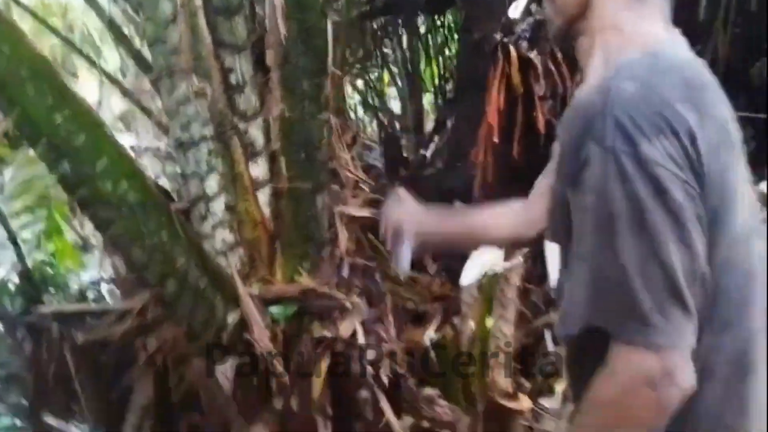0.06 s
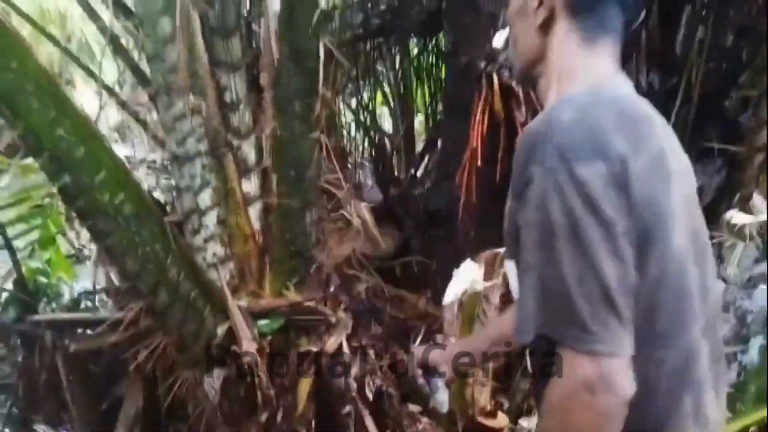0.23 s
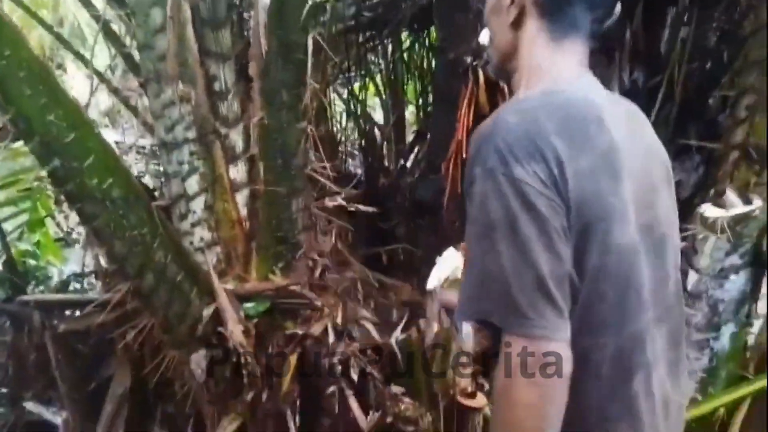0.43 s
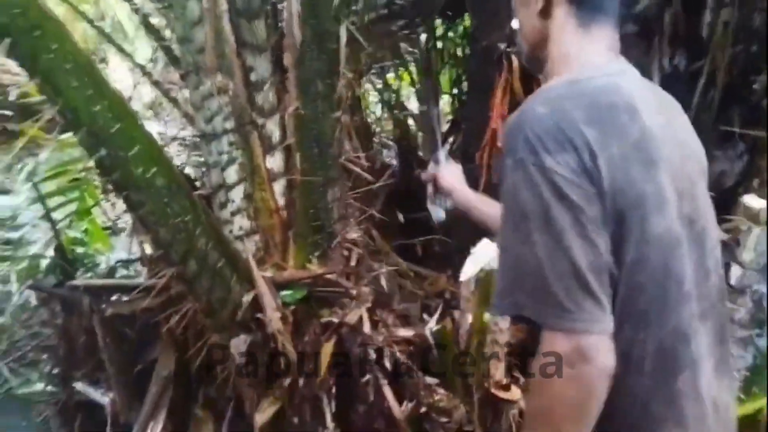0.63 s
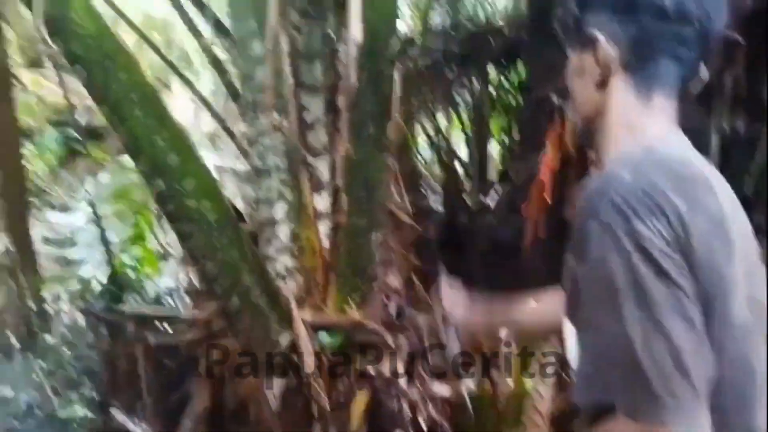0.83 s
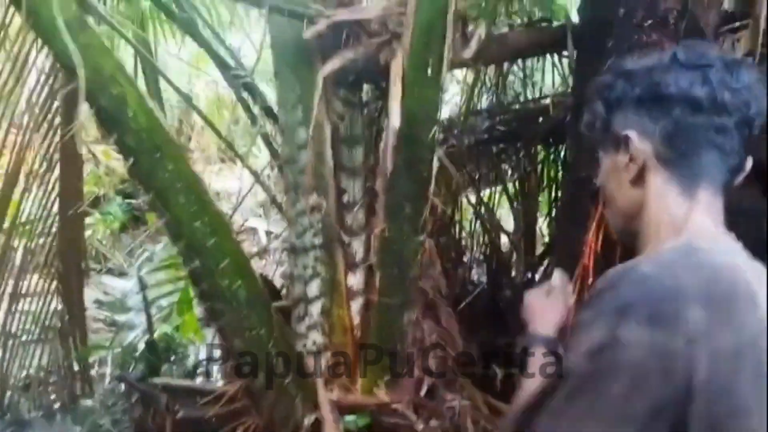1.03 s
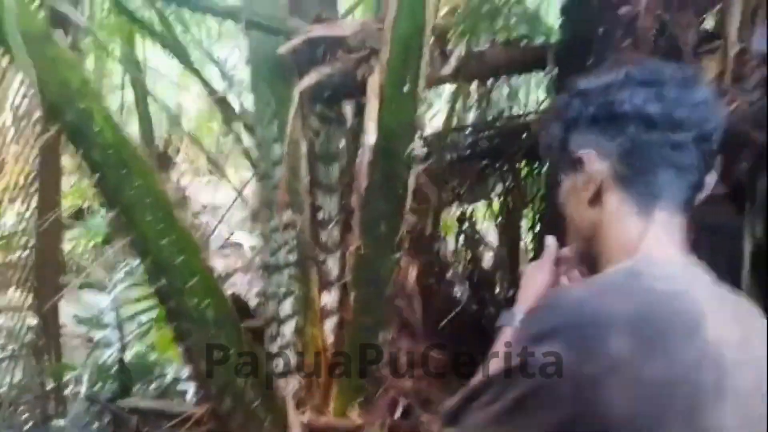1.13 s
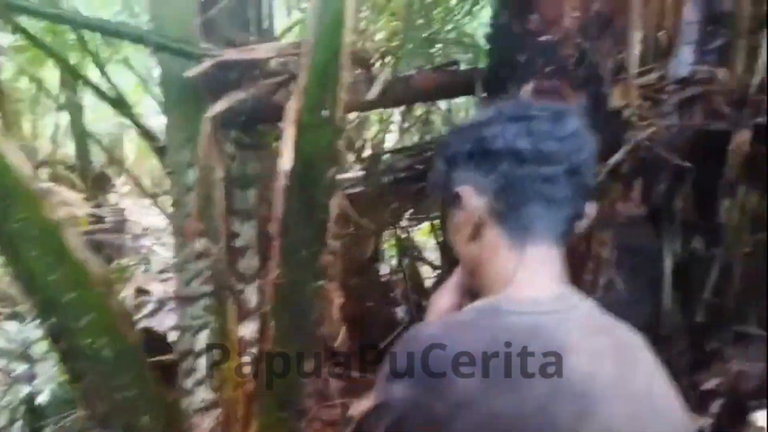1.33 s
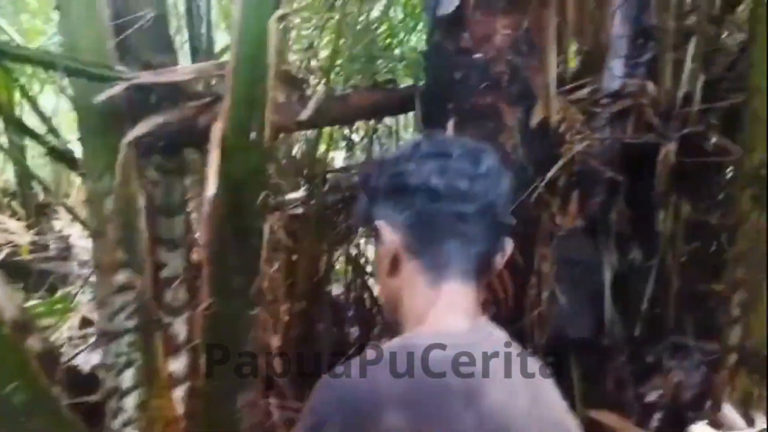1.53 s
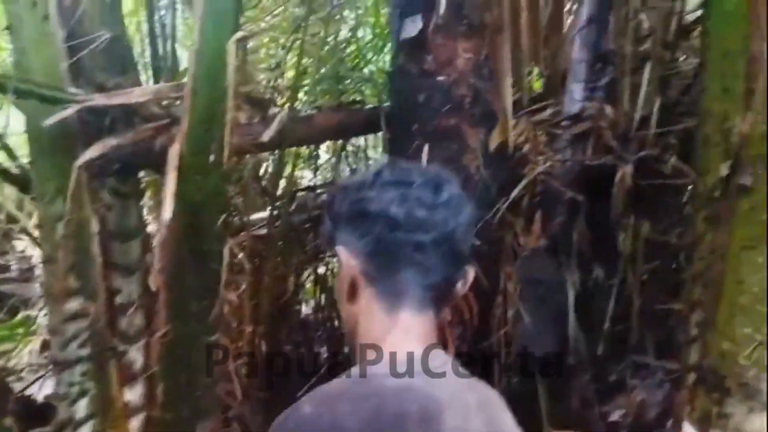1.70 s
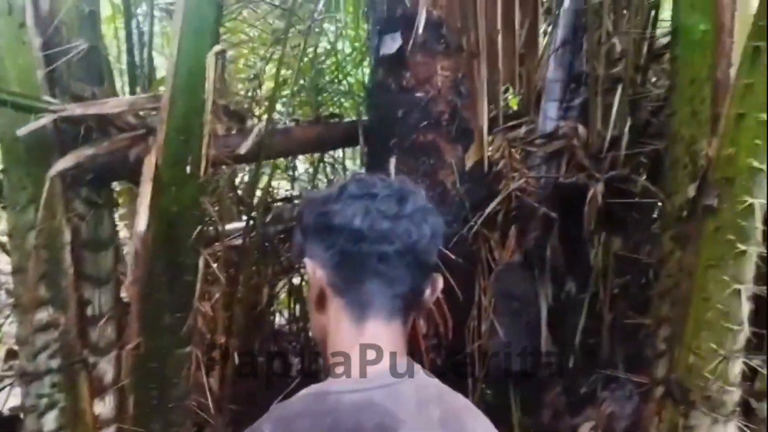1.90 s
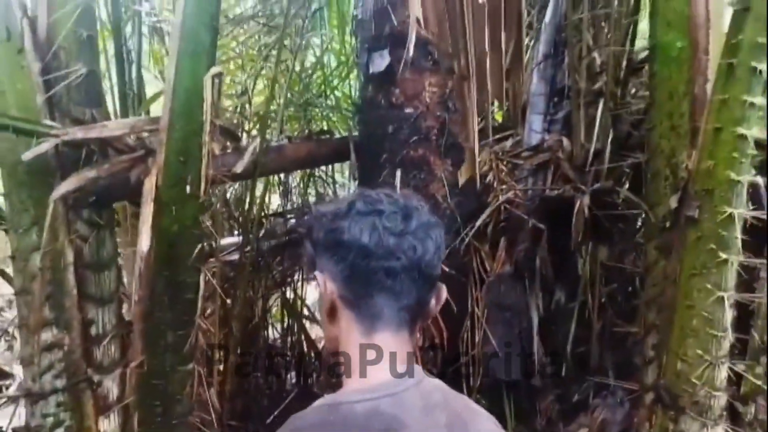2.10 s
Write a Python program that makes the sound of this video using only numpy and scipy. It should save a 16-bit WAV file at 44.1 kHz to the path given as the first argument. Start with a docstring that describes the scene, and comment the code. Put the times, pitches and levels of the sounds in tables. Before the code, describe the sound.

A machete chops a spiny palm base in a forest, heard close in stereo. Dry fronds rustle at first; at 0.2 s a sharp cut cracks, with hollow knocks and bright snaps until 0.4 s. Rustling and small rib cracks follow. From 1.0 to 1.3 s a longer crunching cut tears fibres, then near quiet, a hard woody chop at 1.8 s, and a faint rustle near 2.1 s. Soft short echo, faint hiss.

```python
"""In a forest, a couple of metres from a stereo microphone, a machete cuts the spiny base of a palm.
Over a faint hiss, dry fronds rustle from the start as bursts of tiny fractures; ribs crack, stalks knock.
At about 0.2, 1.0 and 1.8 s come three cuts: dense runs of random fractures that also ring the blade's modes.
Bright noise bursts give short snaps and a few softer swishes; blows ring the hollow stalks' damped modes.
The trunks return a short, soft echo of it all, made by convolution with decaying noise."""
import sys
import numpy as np
from scipy import signal
from scipy.fft import rfft, irfft, next_fast_len
from scipy.io import wavfile

SR = 44100
rng = np.random.default_rng(int(sys.argv[2]) if len(sys.argv) > 2 else 0)


def unload_wav(signal):
    """Save mono or channel-first audio to the path in sys.argv[1] as 16-bit WAV at rate SR, clipped to [-1, 1]."""
    wavfile.write(
        sys.argv[1],
        SR,
        np.round(np.clip(np.atleast_2d(signal).T, -1, 1) * 32767).astype(np.int16),
    )


N = 94815


def undb(db):
    """Decibels to gain."""
    return 10 ** (np.asarray(db) / 20)


def unit(x):
    """Scale to rms 1."""
    return x / np.sqrt(np.mean(x ** 2) + 1e-20)


def since(start):
    """Seconds since a moment, zero before it."""
    return np.maximum(np.arange(N) / SR - start, 0)


def colour(x, points):
    """Causal minimum-phase filter through (Hz, dB) points, interpolated over log frequency."""
    size = next_fast_len(N + 4096)
    hz, db = np.array(points).T
    f = np.maximum(np.abs(np.fft.fftfreq(size, 1 / SR)), 1)
    gain = undb(np.interp(np.log(f), np.log(hz), db))
    # Folding the cepstrum onto positive time makes the filter causal.
    cepstrum = np.fft.ifft(np.log(gain)).real
    cepstrum[1:size // 2] *= 2
    cepstrum[size // 2 + 1:] = 0
    return irfft(rfft(x, size) * np.exp(rfft(cepstrum, size)), size)[..., :N]


def butter(x, kind, hz, order=2):
    """Butterworth low-pass or high-pass."""
    return signal.sosfilt(signal.butter(order, hz, kind, fs=SR, output="sos"), x)


def band(x, hz, q):
    """Resonant band-pass."""
    return signal.lfilter(*signal.iirpeak(min(hz, SR / 3), max(q, .6), fs=SR), x)


def ring(x, hz, t60):
    """One decaying mode driven by x."""
    pole = np.exp((2j * np.pi * hz - np.log(1000) / t60) / SR)
    return signal.lfilter([1], [1, -pole], x + 1e-18).imag


# Stereo width at the microphone. Each row: frequency in Hz, side minus mid in dB.
SIDE_BY_FREQUENCY = [(50, 0), (170, -16.5), (400, -11.5), (800, -5.5), (1500, -2.5), (3000, -0.5),
                     (6000, 0.5), (9000, -10.5), (11000, -14.5), (15000, -11.5)]


def stereo(pair):
    """Mid and side to left and right; the low mids and the top stay nearer the centre."""
    mid, side = pair[0], colour(pair[1], SIDE_BY_FREQUENCY)
    return unit(np.array([mid + side, mid - side]))


RIGHT_DB = 1  # how much louder the fronds, cuts and echo are panned on the right


def pan(db):
    """Left and right gains for a source that is db louder on the right."""
    return undb(np.array([[-db], [db]]) / 2)


def crackle(rate, spread_db):
    """Tiny fractures at random times with scattered sizes, as mid and side."""
    struck = rng.random(N) < rate / SR
    size = struck * undb(spread_db * np.clip(rng.standard_normal(N), -2, 2))
    return unit(size * np.sign(rng.standard_normal((2, N))))


BURST_RISE_S = .0004


def burst(start, decay_s):
    """A sharp rise and an exponential fall."""
    age = since(start)
    return (1 - np.exp(-age / BURST_RISE_S)) * np.exp(-np.minimum(age / decay_s, 40))


def wander(seconds):
    """A random level that changes within the given time; rms 1."""
    return unit(signal.lfilter([1], [1, -np.exp(-1 / (seconds * SR))], rng.standard_normal(N)))


def splinters(lo_hz, hi_hz, rate, t60, spread_db, count):
    """Many slivers, each with its own pitch, tick at their own random moments."""
    pitches = lo_hz + (hi_hz - lo_hz) * (np.arange(count) + rng.random(count)) / count
    return unit(sum(ring(crackle(rate, spread_db), hz, t60) for hz in pitches))


STALK_ECHO_S, STALK_ECHO_DB, STALK_MIRROR_HZ = .004, -2.5, 1500  # longest lag, level, lowest treble


def nearby(x, count=7):
    """The thin stalks right around a source mirror its treble within milliseconds and ripple its colour."""
    lags = (STALK_ECHO_S * SR * rng.uniform(.1, 1, count)).astype(int)
    signs = np.sign(rng.standard_normal(count))
    treble = butter(x, "high", STALK_MIRROR_HZ)
    mirrored = sum(sign * np.roll(treble, lag, axis=-1) for sign, lag in zip(signs, lags))
    return unit(x + undb(STALK_ECHO_DB) / np.sqrt(count) * mirrored)


FOREST_DB = -56
# Colour of the forest hiss. Each row: frequency in Hz, gain in dB.
FOREST_COLOUR = [(25, -17), (60, 0), (110, 7.5), (280, 5), (600, 0.5), (1500, -14), (3200, 0), (5500, -1),
                 (9600, 2.5), (15500, -32)]


def forest():
    """The faint hiss of the forest is steady noise with a fixed colour."""
    return undb(FOREST_DB) * stereo(colour(rng.standard_normal((2, N)), FOREST_COLOUR))


RUSTLES_PER_S, RUSTLE_SPREAD_DB = 3600, -0.5
SCRAPE_DB, SCRAPE_Q, SCRAPE_SPREAD_DB, SCRAPE_S = -6, 4, 7, .012


def scrapes(lo_hz, hi_hz, count):
    """Leaves of different sizes rub, each in its own band and its own short spurts."""
    grain = stereo(crackle(RUSTLES_PER_S, RUSTLE_SPREAD_DB))
    out = 0
    for hz in np.geomspace(lo_hz, hi_hz, count):
        leaf = unit(band(band(grain, hz, SCRAPE_Q), hz, SCRAPE_Q))
        out = out + leaf * undb(SCRAPE_SPREAD_DB * np.clip(wander(SCRAPE_S), -2, 2))
    return unit(out)


CATCH_DB, CATCH_S = 2.2, .004  # unevenness of the brushing, and how fast it changes
TICK_DB, TICKS_PER_S, TICK_SPREAD_DB, TICK_T60_S = -5, 14, 5, .025  # the rate is for each rib
# Colour of dry fronds and tough strands. Each row: frequency in Hz, gain in dB.
FROND_COLOUR = [(60, 2), (250, 7.5), (800, 4), (1500, 3), (2200, 2.5), (3300, 5), (4500, -1), (5600, -9.5),
                (6700, 6), (7800, -11.5), (9500, 1), (15500, -1.5)]
# Loudness of the rustle over time. Each row: time in seconds, level in dB.
RUSTLE_LEVEL = [(0, -42), (.1, -47.5), (.17, -49.5), (.33, -40.5), (.46, -40.5), (.55, -43.5), (.63, -39),
                (.73, -45.5), (0.808, -54), (.87, -47), (.92, -44.5), (.96, -48), (1.2, -43.5), (1.29, -56),
                (1.336, -48.5), (1.411, -54), (1.52, -53.5), (1.61, -58.5), (1.65, -42), (1.69, -60),
                (1.74, -56.5), (2.07, -55), (2.15, -50.5)]


def fronds():
    """Dry leaves brush and scrape in uneven little spurts while their ribs tick."""
    at, db = np.array(RUSTLE_LEVEL).T
    brush = nearby(stereo(colour(crackle(RUSTLES_PER_S, RUSTLE_SPREAD_DB), FROND_COLOUR)))
    brush = brush * undb(CATCH_DB * wander(CATCH_S))
    ribs = splinters(734, 4466, TICKS_PER_S, TICK_T60_S, TICK_SPREAD_DB, count=16)
    ticks = stereo(colour(ribs, FROND_COLOUR))
    leaves = brush + undb(TICK_DB) * ticks + undb(SCRAPE_DB) * scrapes(914, 3650, count=9)
    return unit(leaves) * undb(np.interp(since(0), at, db)) * pan(RIGHT_DB)


CRACK_Q, RIB_RING_DB, RIB_RING_Q, CLICK_DB = 2.5, -2, 14, 0.5
# Dry twigs and frond ribs cracking. Each row: start in seconds, level in dB, pitch in Hz,
# decay time constant in seconds, right minus left in dB.
RIB_CRACKS = [(.002, -38, 2310, 0.035, -1), (0.241, -26.5, 3430, 0.024, 3),
              (0.2424, -15.5, 8940, 0.0068, -2), (0.288, -20, 4950, 0.0078, -2),
              (0.3996, -32, 1500, 0.0019, 13), (0.4636, -34, 3260, 0.0052, 4),
              (0.4704, -32, 2870, 0.0047, 1), (0.528, -41.5, 3460, 0.0046, -1),
              (0.54, -45.5, 1420, 0.033, -5), (.593, -45, 3540, .007, 10), (0.6145, -38, 3220, 0.0072, 9),
              (0.6533, -37.5, 2860, .008, 9), (0.6752, -32, 1900, 0.0057, 7),
              (0.6966, -29.5, 1610, 0.0059, 7), (0.73, -37, 2050, 0.0049, 8),
              (0.8455, -45.5, 2780, 0.0012, 35), (0.8823, -32.5, 3320, 0.015, 5.5),
              (0.926, -41.5, 3500, 0.014, 10), (1.009, -27, 3020, 0.0062, -1),
              (1.093, -30.5, 2870, .005, -8), (1.159, -25, 2400, 0.0085, 5),
              (1.2709, -37, 2470, 0.0032, -1), (1.6515, -37.5, 2530, 0.0042, 3),
              (1.752, -38, 2980, 0.0023, 5), (1.7734, -30, 2920, 0.0013, -22),
              (1.779, -19.5, 1700, 0.0035, -8), (2.122, -45.5, 3800, 0.067, 1)]


def cracks():
    """Dry ribs break with a sharp click and a short crumble, through a broad resonance and a narrow ring."""
    grain = stereo(rng.standard_normal((2, N)))
    out = 0
    for start, db, hz, decay, right in RIB_CRACKS:
        broad = unit(band(band(grain, hz, CRACK_Q), hz, CRACK_Q / 2))
        narrow = unit(band(grain, hz, RIB_RING_Q))
        crumble = burst(start, decay) * unit(broad + undb(RIB_RING_DB) * narrow)
        click = band(band(signal.unit_impulse(N, int(start * SR)), hz, 0.8), hz, 2.2)
        click = click / np.abs(click).max()
        out = out + undb(db) * pan(right) * (crumble + undb(CLICK_DB) * click)
    return out


STALK_LOWEST_HZ, CONTACT_S = 102, .0009  # high-pass corner, rise time constant of a knock
BLOW_RATTLE_DB, RATTLE_SHARE = -10.5, 0.73  # the rattle's decay is this share of the smothering time
# Modes of the hollow stalks. Each row: frequency in Hz, level in dB, t60 before smothering in seconds.
STALK_MODES = [(120, 13, 0.2), (211.4, 10.5, 0.37), (255.7, 12, 0.13), (330, -6, 0.12), (400, -4, 0.022),
               (491.3, 8, 0.073), (614, 0.5, 0.07), (652.6, 9, 0.056), (719.7, 4, 0.095), (847, 13, 0.02),
               (1032, 7, .07), (1108, 9, 0.029), (1366, 18.5, 0.014), (1723, 12, 0.17)]
# Blows on the stalks. Each row: start in seconds, level in dB, centre of the ring in Hz,
# its spread in octaves, time constant in seconds in which the husk smothers it.
STALK_BLOWS = [(.002, -43, 292, 1.6, 0.021), (.216, -24.5, 524, 0.19, 0.024), (.221, -24, 1080, 0.18, .04),
               (.236, -24, 258, 0.12, 0.094), (.243, -27.5, 770, 0.59, 0.033),
               (.294, -31.5, 520, 0.37, 0.057), (.297, -39, 242, 0.41, .06),
               (0.402, -30.5, 306.4, 0.12, 0.038), (.404, -39.5, 850, 0.58, 0.013),
               (.566, -42, 1110, 0.13, 0.023), (.6135, -41.5, 830, 0.15, 0.039),
               (.6525, -32.5, 666, 0.56, 0.027), (.6745, -31, 820, 0.63, 0.023),
               (.6965, -31, 604, 0.13, 0.022), (.731, -44, 790, 0.97, 0.052),
               (0.7805, -49, 920, 0.18, 0.015), (1.011, -24.5, 746, 0.16, 0.064),
               (1.012, -28.5, 1090, 0.32, 0.008), (1.017, -29.5, 219, 0.22, 0.05),
               (1.053, -25.5, 373, 0.4, 0.031), (1.093, -26.5, 700, 0.13, 0.006),
               (1.098, -28, 480, 0.091, 0.033), (1.100, -30, 272, 0.15, 0.088),
               (1.164, -35.5, 820, 0.58, 0.019), (1.1693, -19, 228, 0.49, 0.018),
               (1.17, -29, 133, .2, 0.019), (1.779, -26.5, 363, 0.24, 0.0087),
               (1.793, -16.5, 302, 0.18, 0.021), (1.794, -26, 562, 0.083, 0.025),
               (1.805, -39, 360, 0.14, 0.029), (1.820, -45, 680, 0.14, 0.0081),
               (1.841, -36, 710, 0.074, 0.0067), (1.850, -28.5, 173, 0.61, 0.025),
               (2.128, -52.5, 800, 0.17, 0.044)]


def stalks():
    """Each blow rings the stalk modes near its own centre and rattles the loose husk."""
    out, husk = 0, stereo(rng.standard_normal((2, N)))
    hz, mode_db, t60 = np.array(STALK_MODES).T[:, :, None]
    age = np.arange(SR // 5) / SR
    modes = undb(mode_db) * np.sin(2 * np.pi * hz * age) * np.exp(-np.log(1000) * age / t60)
    for start, db, centre, spread, smother in STALK_BLOWS:
        weight = np.exp(-.5 * (np.log2(hz / centre) / spread) ** 2)
        knock = (weight * modes).sum(axis=0)
        knock = knock * (1 - np.exp(-age / CONTACT_S)) * np.exp(-age / smother)
        knock = knock / np.sqrt(np.sum(knock ** 2) / (SR / 100))  # the energy of rms 1 over 10 ms
        rattle = burst(start, RATTLE_SHARE * smother) * unit(band(band(husk, centre, 1.0), centre, 1.0))
        knock = np.pad(knock, (int(start * SR), N))[:N]
        out = out + undb(db) * (knock + undb(BLOW_RATTLE_DB) * rattle)
    return butter(out, "high", STALK_LOWEST_HZ)


# Colour of crisp fibres and bright bursts. Each row: frequency in Hz, gain in dB.
FIBRE_COLOUR = [(500, -4.5), (2500, -6.5), (5200, -5), (6500, 5), (7200, -0.5), (9200, 9), (11000, -0.5),
                (12300, 9), (15000, 5.5), (16000, 12)]
# Bright noise bursts: short snaps of spines and fibres, and a few longer, softer swishes.
# Each row: start in seconds, level in dB, decay time constant in seconds, right minus left in dB.
BRIGHT_BURSTS = [(0.1874, -30, 0.013, 4.5), (0.2087, -8, 0.0012, 16), (0.2413, -26, 0.0027, -12),
                 (0.2443, -13, 0.0034, 6), (0.289, -12.5, 0.0059, 0), (0.3747, -23, 0.0064, -14),
                 (0.3802, -25, 0.0049, 30), (0.3961, -2.5, 0.001, -4), (0.4011, -8.5, 0.0035, 3.5),
                 (0.407, -32, 0.041, -6), (.817, -41.5, 0.0022, 24.5), (0.915, -32.5, 0.026, 2),
                 (0.9717, -24, 0.0018, 18.5), (0.992, -24.5, 0.0053, 4), (1.0455, -3, 0.00076, -6),
                 (1.0901, -15, 0.015, 3.5), (1.159, -16, 0.0095, 0), (1.325, -40.5, 0.026, -3),
                 (1.387, -40.5, 0.082, -1.5), (1.779, -11.5, 0.0034, -4), (1.79, -4, 0.0013, -1),
                 (2.088, -41, 0.0024, 20), (2.131, -34.5, 0.018, 12.5)]


def snaps_and_swishes():
    """Bright noise bursts rise sharply: short ones are snaps of spines and fibres, longer ones soft swishes."""
    grain = stereo(colour(rng.standard_normal((2, N)), FIBRE_COLOUR))
    out = 0
    for start, db, decay, right in BRIGHT_BURSTS:
        out = out + undb(db) * burst(start, decay) * pan(right) * nearby(grain)
    return out


FIBRES_PER_S, FIBRE_SPREAD_DB = 17000, -3
STRANDS_PER_S, STRAND_SPREAD_DB, STRAND_DB = 420, 5, -6.5
SPLINTERS_PER_S, SPLINTER_SPREAD_DB = 200, 7  # the rate is for each sliver
SPLINTER_T60_S, SPLINTER_DB = 0.028, 10.5
JERK_DB, JERK_S, RELEASE_DB_PER_S = -1.94, 0.0075, 413  # the release is the fall once the edge stops
# Colour of wet pulp. Each row: frequency in Hz, gain in dB.
PULP_COLOUR = [(40, 6), (110, -65), (240, 7), (600, -2.5), (1400, -5), (2400, -3.5), (3600, -5), (5500, -7),
               (9000, -8.5), (16000, -7.5)]
# The three cuts. Each row: start in seconds, rise in seconds, length in seconds, sag in dB per second,
# then the levels in dB of crisp fibres, wet pulp and blade ring.
MACHETE_CUTS = [(0.2085, 0.0045, 0.059, 31, -25, -27.5, -34), (0.978, 0.033, 0.3, 201, -21.5, -28.5, -33.5),
                (1.773, 0.0038, 0.069, 57, -24, -21, -46)]


def cuts():
    """The edge jerks through fibres, splinters and pulp, slows and stops; strands pop, the blade rings."""
    tearing = crackle(FIBRES_PER_S, FIBRE_SPREAD_DB)
    pulp = stereo(colour(crackle(FIBRES_PER_S / 2, FIBRE_SPREAD_DB), PULP_COLOUR))
    strands = stereo(colour(crackle(STRANDS_PER_S, STRAND_SPREAD_DB), FROND_COLOUR))
    jerks = undb(JERK_DB * wander(JERK_S))
    out, push = 0, stereo(tearing)
    for start, rise, length, sag, fibre_db, pulp_db, blade_db in MACHETE_CUTS:
        slivers = splinters(1284, 15500, SPLINTERS_PER_S, SPLINTER_T60_S, SPLINTER_SPREAD_DB, count=20)
        fibres = stereo(colour(tearing + undb(SPLINTER_DB) * slivers, FIBRE_COLOUR))
        fall_db = sag * since(start + rise) + RELEASE_DB_PER_S * since(start + length)
        effort = jerks * np.minimum(since(start) / rise, 1) * undb(-fall_db)
        crisp = nearby(fibres) + undb(STRAND_DB) * strands
        out = out + effort * (undb(fibre_db) * crisp + undb(pulp_db) * nearby(pulp))
        out = out + undb(blade_db) * blade(effort * push)
    return out * pan(RIGHT_DB)


BLADE_DETUNE = .003  # random spread of each mode, as a fraction of its frequency
# Modes of the steel. Each row: frequency before detuning in Hz, level in dB, t60 in seconds.
BLADE_MODES = [(4700, -7, .04), (6650, -3, .03), (7600, -4, .04), (8730, 0, .08), (8850, -1, .04),
               (9110, -1, .04), (9480, -2, .05), (9730, -1, .05), (11750, 1, .03), (12350, -1, .03),
               (13300, -4, .04), (14060, -3, .06), (14640, -2, .06), (15385, -5, .08)]


def blade(push):
    """The steel rings; the grip of the stalk shifts its modes a little at every cut."""
    hz, db, t60 = np.array(BLADE_MODES).T[:, :, None]
    hz = hz * (1 + BLADE_DETUNE * rng.standard_normal(hz.shape))
    age = np.arange(SR // 10) / SR
    evened = np.sqrt(np.log(1000) * 2 / (t60 * SR))  # gives long and short modes similar energy
    modes = undb(db) * evened * np.sin(2 * np.pi * hz * age) * np.exp(-np.log(1000) * age / t60)
    return signal.fftconvolve(push, modes.sum(axis=0)[None], axes=1)[:, :N]


ECHO_DB, ECHO_T60_S, ECHO_LOW_DB, ECHO_LOW_T60_S = -8, 0.4, -19, 0.71
ECHO_BUILD_S, ECHO_SPLIT_HZ = 0.0017, 1800


def echo(x):
    """Trunks and leaves scatter a diffuse tail, with its own decay for lows and highs."""
    age = since(0)
    lows = butter(x, "low", ECHO_SPLIT_HZ)
    highs = butter(x, "high", ECHO_SPLIT_HZ)
    out = 0
    for part, db, t60 in ((lows, ECHO_LOW_DB, ECHO_LOW_T60_S), (highs, ECHO_DB, ECHO_T60_S)):
        envelope = np.exp(-np.log(1000) * age / t60) * (1 - np.exp(-age / ECHO_BUILD_S))
        tail = unit(stereo(rng.standard_normal((2, N))) * envelope) / np.sqrt(N)
        out = out + undb(db) * signal.fftconvolve(part.mean(axis=0)[None], tail, axes=1)[:, :N]
    return out * pan(RIGHT_DB)


LOW_CUT_HZ = 360


def scene():
    """The chopping and rustling, thin in the bass, with their echo and the faint hiss of the forest."""
    sources = fronds() + cracks() + stalks() + snaps_and_swishes() + cuts()
    near = butter(sources, "high", LOW_CUT_HZ, order=1)
    return near + echo(near) + forest()


TOP_HZ = 15600


def record(dry):
    """The recorder cuts the top with a steep low-pass."""
    return signal.sosfilt(signal.ellip(10, .2, 75, TOP_HZ, fs=SR, output="sos"), dry)


dry = scene()
out = record(dry)
unload_wav(out)
```